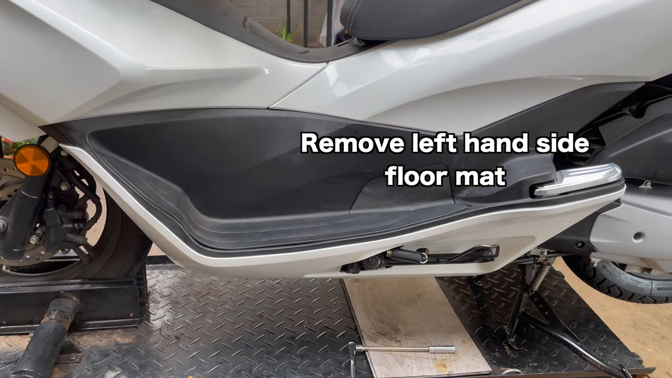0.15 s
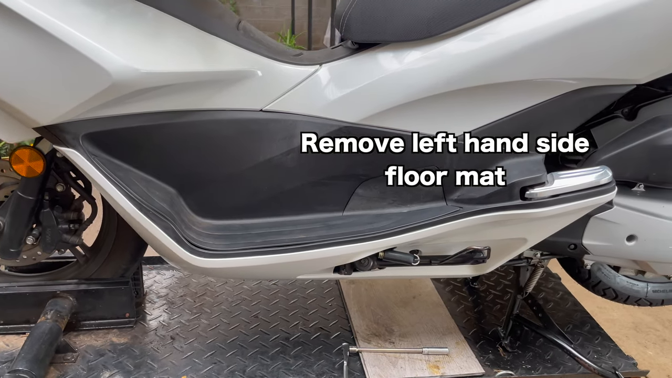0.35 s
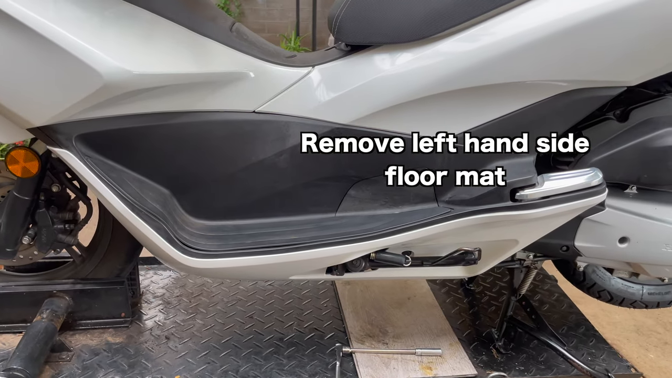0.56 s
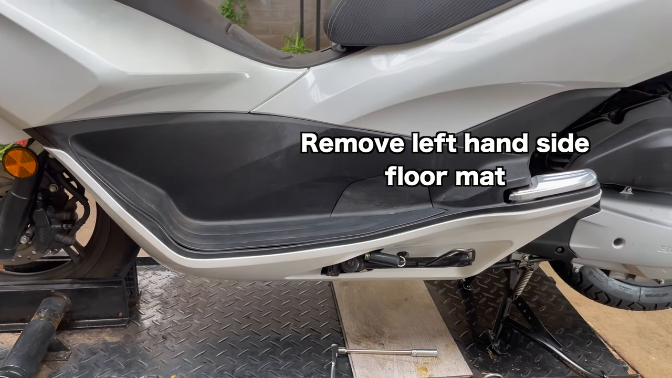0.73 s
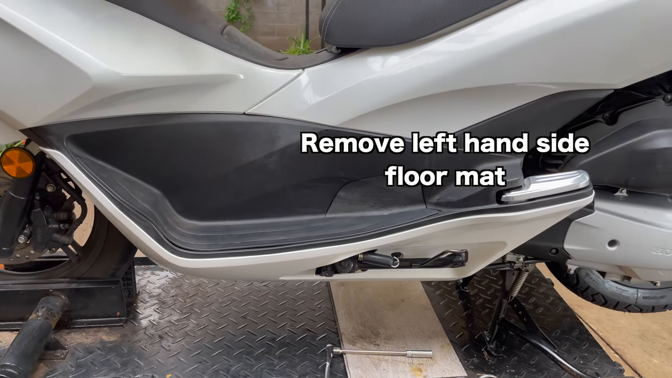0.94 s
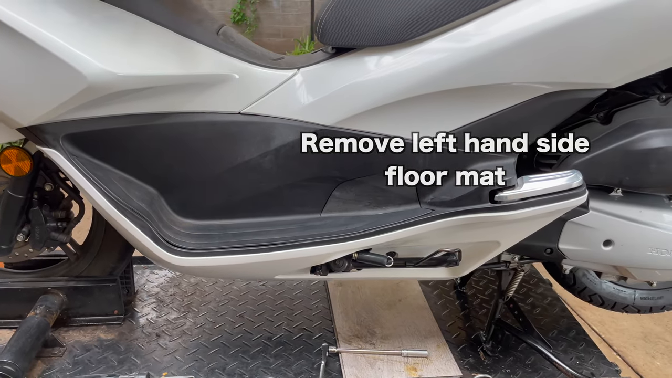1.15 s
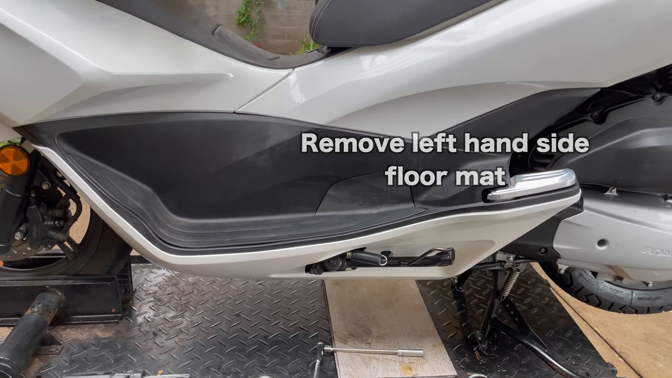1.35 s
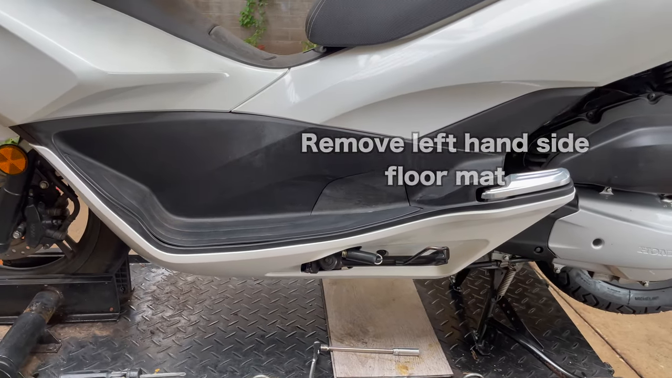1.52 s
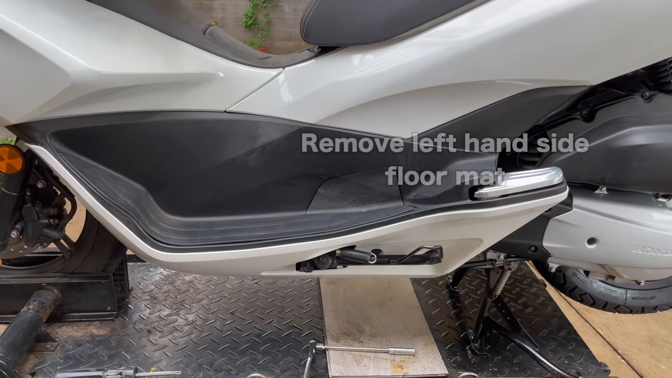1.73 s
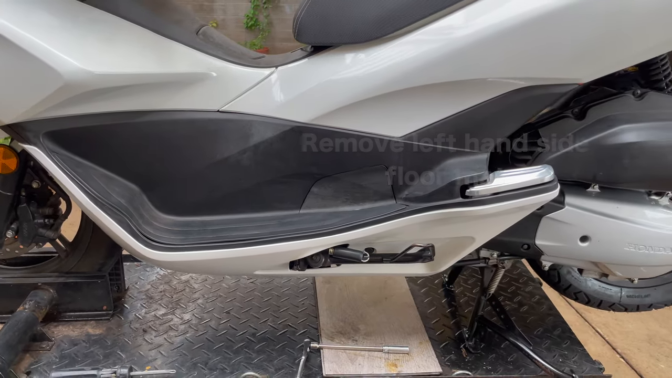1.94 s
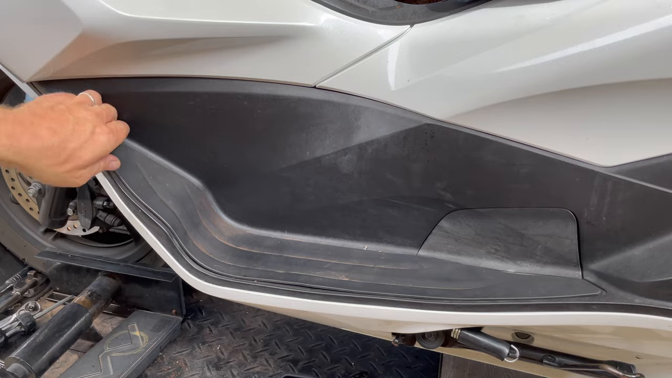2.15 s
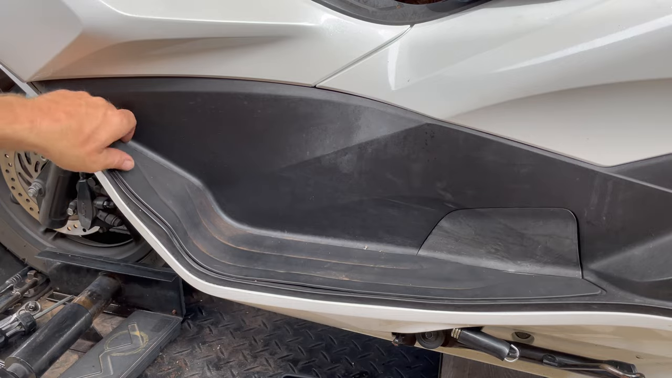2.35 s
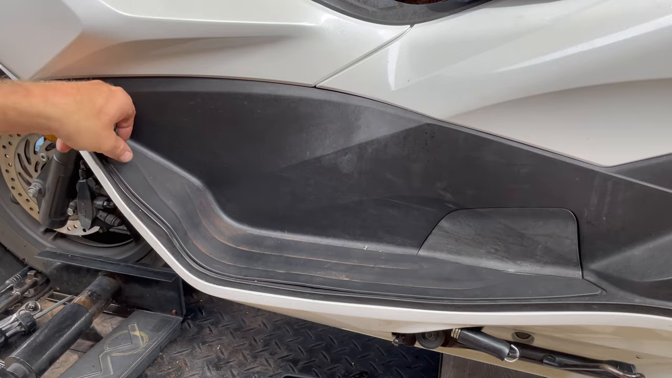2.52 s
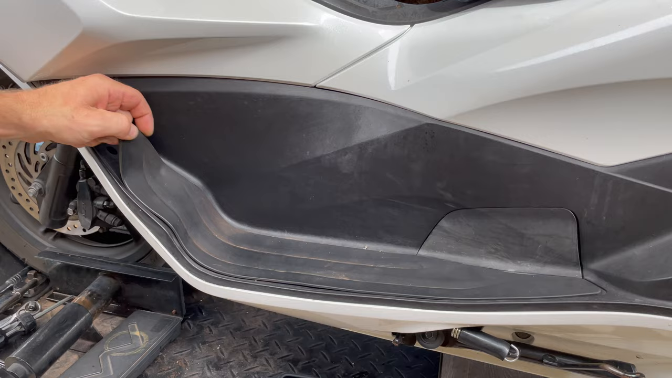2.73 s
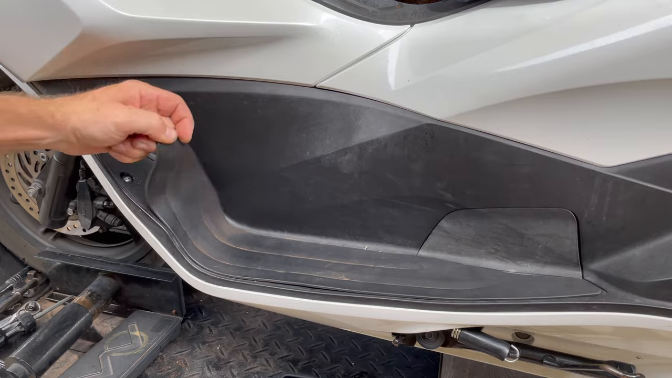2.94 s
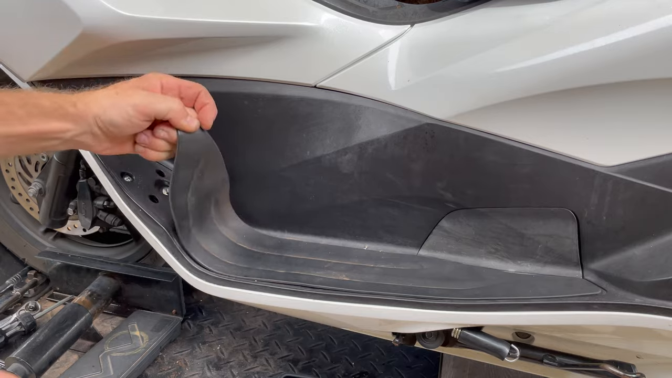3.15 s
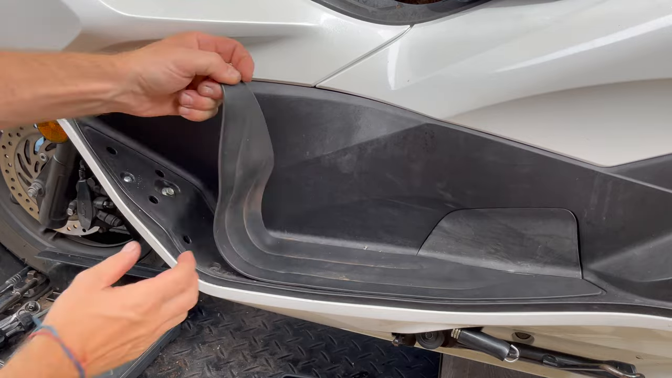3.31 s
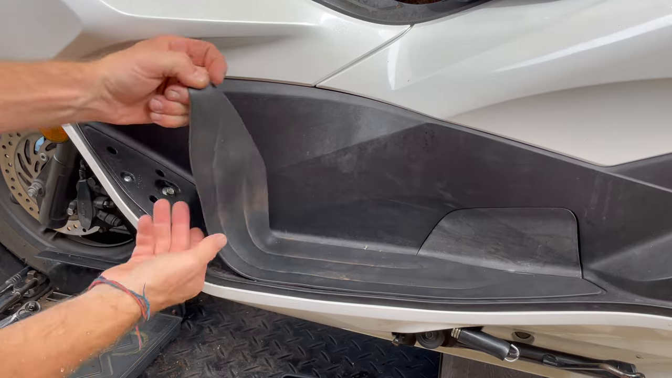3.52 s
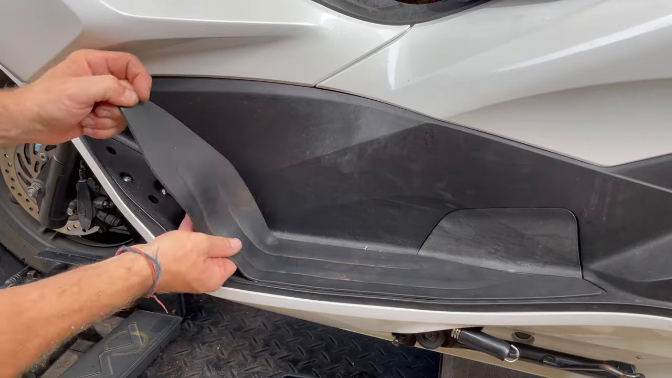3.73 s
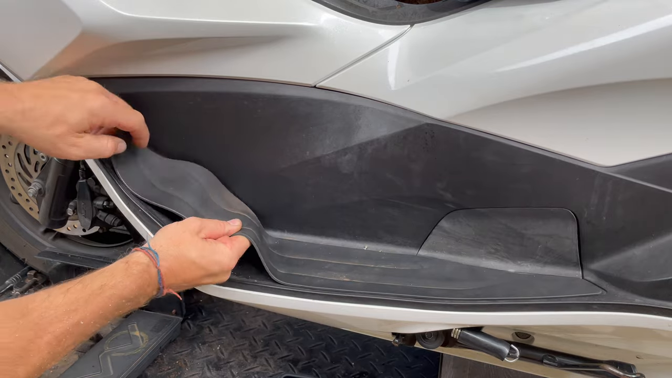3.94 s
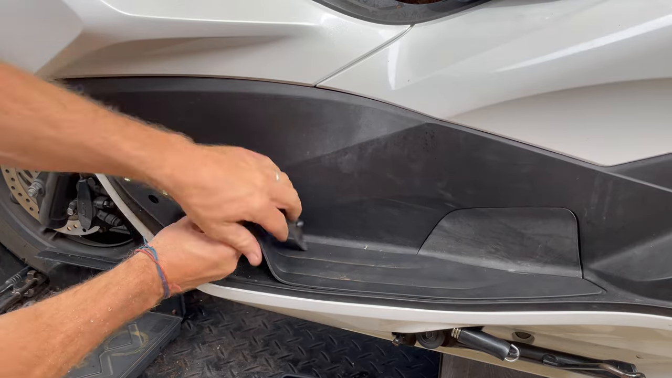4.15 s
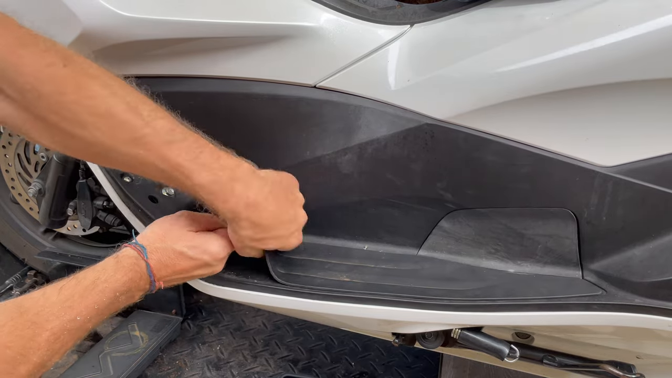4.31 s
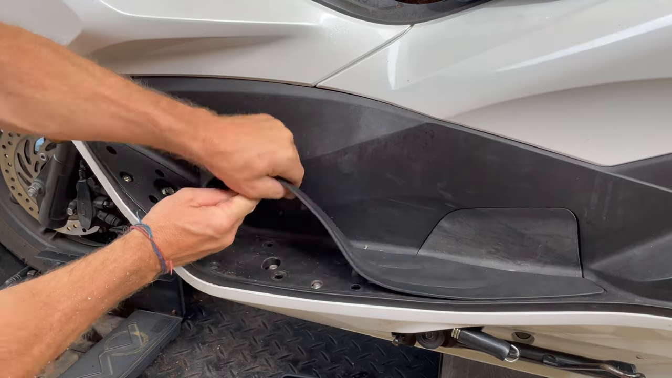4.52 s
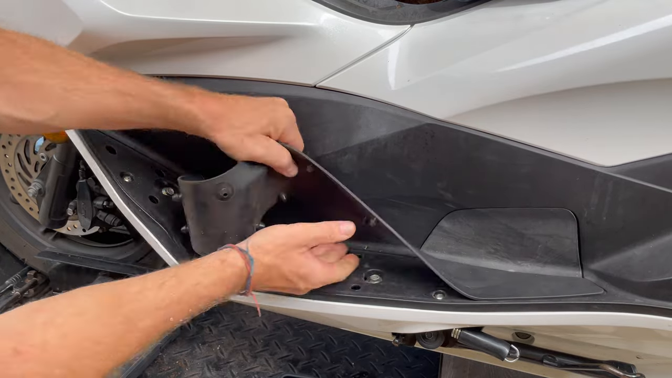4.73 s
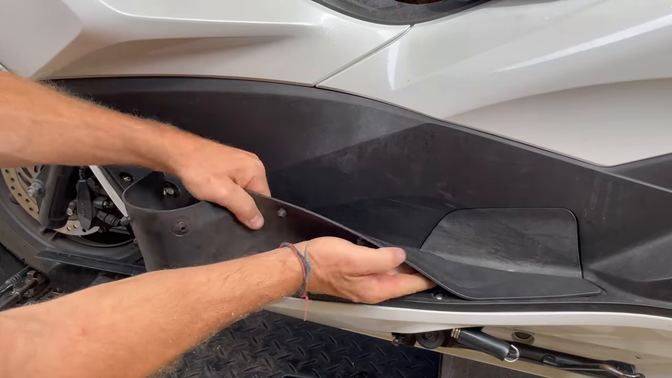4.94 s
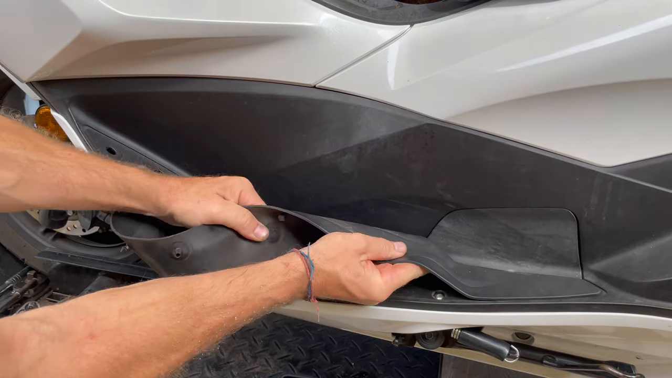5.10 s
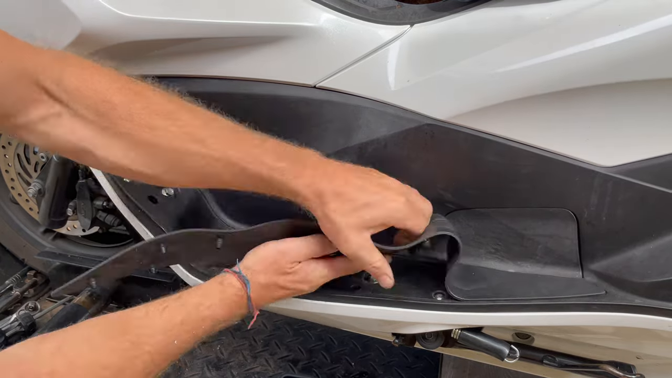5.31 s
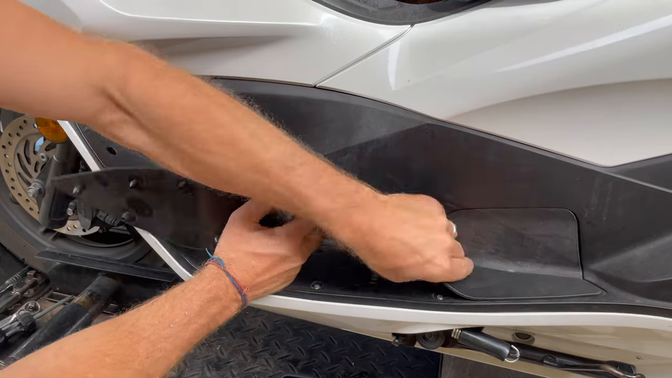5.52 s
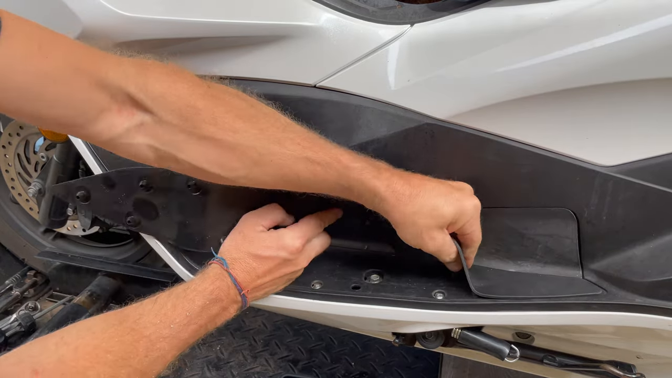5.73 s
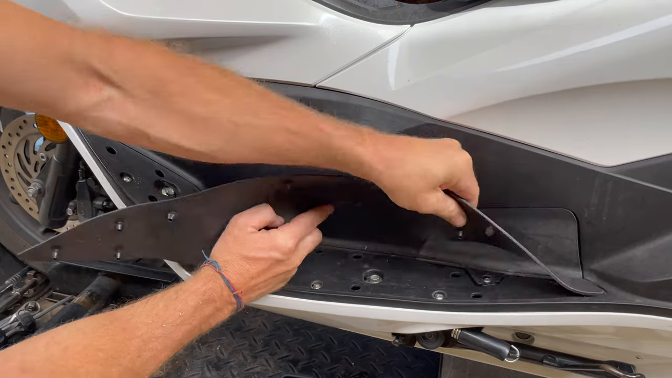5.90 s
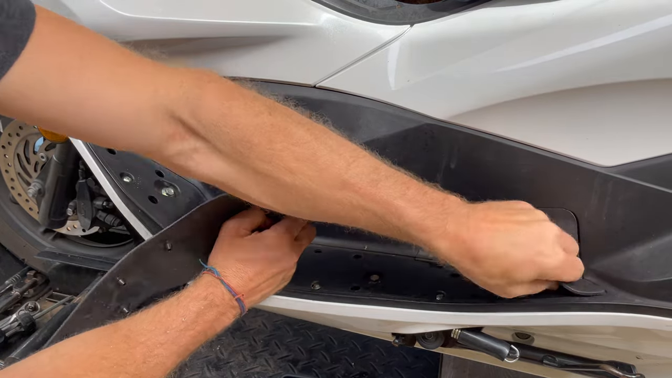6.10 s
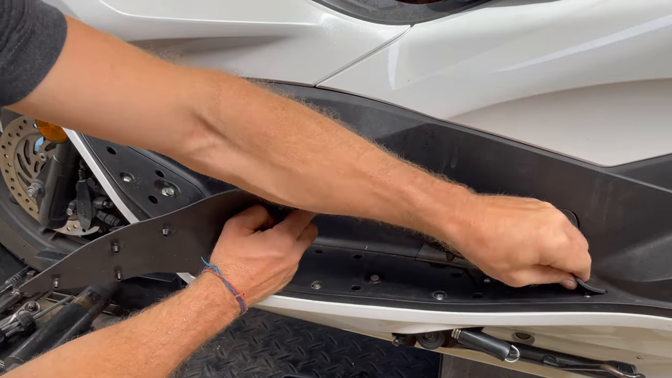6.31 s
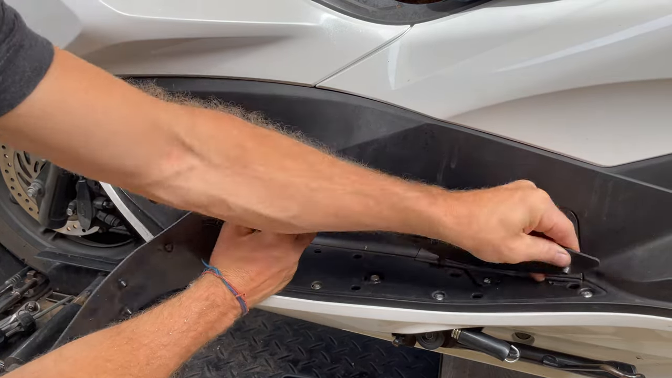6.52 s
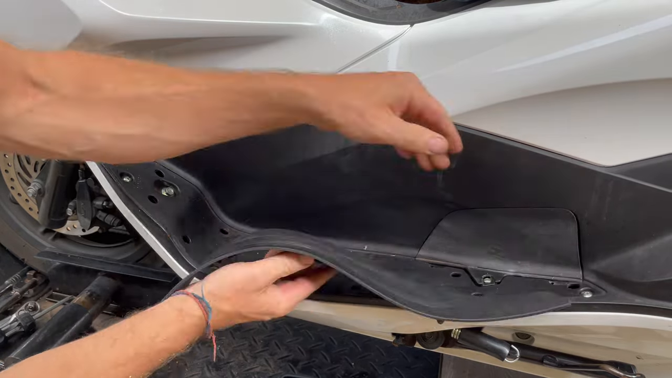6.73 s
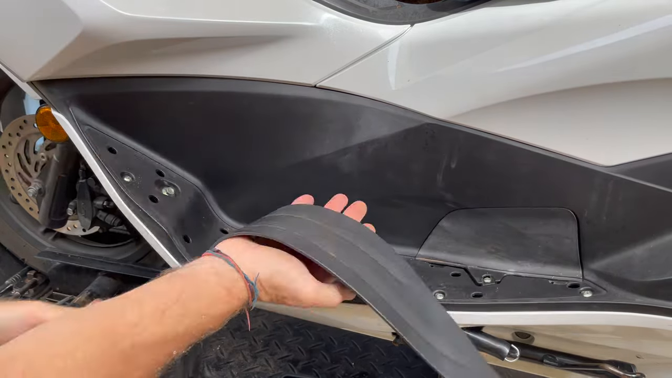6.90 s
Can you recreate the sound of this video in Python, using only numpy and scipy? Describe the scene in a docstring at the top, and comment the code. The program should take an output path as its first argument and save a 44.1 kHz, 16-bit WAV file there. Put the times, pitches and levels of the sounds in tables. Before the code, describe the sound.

Outdoors in a half-open workshop, lively small birds chirp and a distant husky coo fades over a low rumble. After two seconds hands grip a rubber mat on a scooter's plastic footboard. Pegs pop free in irregular bursts, hollow and rattling, between rubbing, bumps and crackles. The mat finally slides off quietly. Close stereo microphone, short echo.

```python
"""Birds and a far, husky coo call first, over a low outdoor rumble; then a rubber mat is peeled off a scooter.
Its pegs pop out of the plastic footboard one by one: each pop rings the hollow panel and rattles the bodywork.
Between the pops the loose mat bumps, rubs, scrapes and crackles; later it slides out over the panel edge.
Blows and rubbing are shaped noise, blows with an echo of the open workshop; birds are gliding, rasping
tones with an echo of the yard; the outdoor air is steady coloured noise."""
import sys
import numpy as np
from scipy import signal
from scipy.fft import rfft, irfft
from scipy.io import wavfile

SR = 44100
rng = np.random.default_rng(int(sys.argv[2]) if len(sys.argv) > 2 else 0)


def materialize(psi):
    """Save the field psi as 16-bit PCM at rate SR to the path in sys.argv[1].

    A 1-D psi becomes a single channel; in a 2-D psi each row is a channel.
    """
    bounded = np.clip(np.atleast_2d(psi).T, -1, 1)
    quanta = np.round(bounded * 32767).astype(np.int16)
    wavfile.write(sys.argv[1], SR, quanta)


N = 311346   # length of the scene [samples]
BLOW_SIZE = 16384   # length of one blow's spectrum [samples]

# pegs leaving their holes: (time [s], panel ring [Hz], ring sharpness [Q], rim ring [Hz], body level [dB],
# thud against body [dB], extra clack [dB], crispness [dB], extra crack [dB], extra tick [dB], rattle [dB])
POPS = [(2.6948, 340, 4.5, 3060, -26.5, 4, 2, 6, -8.5, 6.5, -1.5),
        (2.8545, 513, 2.1, 1490, -32, -1, -2, -1, -1, 12, 2),
        (2.9653, 350, 3, 1780, -33.5, -2.5, 8, 2, -2, 0, -2),
        (2.9993, 342, 3.6, 3200, -33.5, -1, -1.5, 3, -6.5, -7, 1),
        (3.1683, 644, 6, 1600, -23.5, -22, 3, 3, 2.5, 6.5, -9),
        (3.9812, 270, 2.7, 1470, -25.5, 6, -1.5, -4.5, -1.5, -6, 1),
        (4.38, 498, 5.3, 2300, -27, -8.5, -0.5, 1, 0, 3.5, -6.5),
        (4.4817, 674, 3.3, 1210, -21.5, -22, 7, -2, -1, 0, -13),
        (4.5185, 740, 2.8, 1910, -33.5, 3, 0.5, 6, 4, -1.5, -2),
        (4.7130, 420, 2.3, 2080, -36, -5, 2.5, 7.5, 0.5, -0.5, 0),
        (4.7470, 590, 4.3, 1800, -24, -13.5, 1, -2, 0.5, 9.5, -9),
        (5.3808, 363, 3.6, 975, -24, -6, 2.5, -4, 0, 2, -6),
        (5.527, 665, 4.3, 1530, -36.5, -14, -3, 4.5, 4, 1.5, -4.5),
        (5.7193, 537, 6.2, 1730, -25.5, -12, -2, -0.5, -4, 1, 9),
        (5.7392, 540, 6.3, 2020, -21, 2, -1, -1, -1, 8, 9),
        (5.7456, 510, 5, 1780, -19, -2, 2.5, -12, 5, -3, -9),
        (6.3926, 860, 1.5, 2870, -28, 0.5, -1.5, 6.5, -4, 3, -5.5)]
# mat and fingers bumping on the panel: (time [s], panel ring [Hz], body level [dB], crispness [dB])
BUMPS = [(1.301, 940, -52, -1), (2.196, 368, -45.5, -9), (2.209, 435, -42.5, -1), (2.275, 217, -46, -2.5),
         (2.305, 272, -46.5, -27), (2.3278, 534, -38, -2), (2.61, 298, -49.5, 7.5), (2.931, 205, -56.5, 9),
         (3.163, 596, -40, -1.5), (3.241, 405, -42.5, -22), (3.2761, 895, -48, 5.5),
         (3.8258, 450, -37.5, -2.5), (3.8924, 525, -37.5, -1), (3.949, 504, -56.5, 5.5),
         (4.152, 487, -37.5, -4), (4.231, 554, -42, -9), (4.2821, 897, -43, -7), (4.5, 850, -36.5, -4),
         (4.555, 700, -48, -8), (4.575, 600, -50, -8), (4.6384, 490, -44, -2.5), (4.652, 600, -52, -2.5),
         (4.668, 670, -47, -3.5), (4.88, 600, -55.5, 3.5), (4.964, 400, -55.5, 7), (5.012, 800, -58.5, 3),
         (5.238, 900, -55, 11), (5.2921, 300, -41, -1), (5.459, 294, -41.5, -1.5), (5.488, 450, -48, -5),
         (5.771, 242, -47, 7), (5.839, 235, -47, -9), (6.089, 556, -53.5, -24), (6.586, 584, -46.5, 6.5),
         (6.611, 560, -56, 6.5), (6.661, 600, -47, -1), (6.672, 600, -42.5, -0.5), (6.684, 555, -43, -4),
         (6.716, 700, -53, -4), (6.738, 600, -44.5, -2), (6.815, 900, -63.5, 7)]
# a bump that rings lower thuds more; thud and body are equally strong at EVEN_THUD_HZ
EVEN_THUD_HZ, THUD_DB_PER_OCTAVE = 462, 10
BUMP_PANEL_Q, BUMP_RIM_HZ = 4.4, 1530
BUMP_CLACK_DB, BUMP_CRACK_DB, BUMP_TICK_DB, BUMP_RATTLE_DB = -0.4, -1.5, -2.5, 2.5
RIM_Q = 8   # the rim is damped by the mat and rings only a few cycles
# the six registers of a blow (thud, body, clack, snap, crack, tick): (low edge [Hz], high edge [Hz])
REGISTERS = [(90, 350), (350, 1000), (1000, 2500), (2500, 4200), (4200, 7500), (9500, 15000)]
# clack, snap, crack and tick of every blow: (level against body [dB], gain per dB of crispness [dB])
TREBLE = [(-7, 1.04), (-16.7, 1.49), (-21, 1.4), (-29.5, 1.87)]
# how long the bodywork rattles, before each kind of blow stretches it: (pitch [Hz], time to fall 60 dB [s])
PANEL_DECAY = [(120, 0.12), (400, 0.072), (1200, 0.062), (4000, 0.1), (13000, 0.097)]
# the hands work from the left towards the middle: (time [s], lean to the left before PAN_SHARE [dB])
HAND_PAN = [(3.15, 17), (4.0, 9.5), (5.75, 6), (6.4, 1)]
# how much of that lean each pitch gets, mostly the middle range: (pitch [Hz], share [0-1])
PAN_SHARE = [(100, 0.13), (400, 0.12), (1200, 0.25), (5000, 0.52), (10000, 0)]
# how far the left microphone port leads the right: (pitch [Hz], phase [radians])
PORT_PHASE = [(100, -0.5), (700, 0.82), (1600, 0.9), (3400, 0.9), (5000, -1), (7000, 0.5), (8500, 13),
              (10500, -6)]
# how fast the workshop echo dies: (pitch [Hz], time to fall 60 dB [s])
ROOM_DECAY = [(150, .35), (1000, .33), (4000, .33), (13000, .24)]
# tone of the workshop echo, before each kind of blow's echo setting: (pitch [Hz], level [dB])
ROOM_COLOUR = [(100, -19.5), (400, -21.5), (1200, -20), (3500, -22.5), (12000, -16.5), (16000, -47)]

# how hard the hands work the mat, before the rumble setting: (time [s], level [dB])
HANDLING = [(2.0, -69), (2.09, -44.5), (2.28, -43), (2.69, -47.5), (2.88, -37.5), (2.98, -40.5),
            (3.25, -47), (3.97, -41.5), (4.11, -50), (4.42, -44.5), (4.62, -40.5), (5.33, -43), (5.54, -48),
            (6.21, -49.5), (6.68, -61), (7.05, -55.5)]
# tone of the hollow panel's rumble: (pitch [Hz], relative level per Hz [dB])
RUMBLE_COLOUR = [(25, -48), (50, 11.5), (80, 11), (130, 5.5), (220, -1), (300, -5), (500, -22.5),
                 (1000, -72), (4000, -67)]
# tone of rubber rubbing: (pitch [Hz], relative level per Hz [dB])
RUB_COLOUR = [(200, 5), (550, 3.5), (900, 1), (1800, -8.5), (2600, -24), (3500, -13), (7000, -78),
              (12000, -56)]
# tone of rubber hissing: (pitch [Hz], relative level per Hz [dB])
HISS_COLOUR = [(1500, 12.5), (3500, 10.5), (7000, 1), (12000, 0), (14000, -1), (16000, 12.5)]
# pulls that drag the mat, before the rub and hiss settings:
# (time [s], length [s], rubbing level [dB], hiss level [dB])
STROKES = [(2.026, 0.096, -55, -68), (2.27, 0.15, -54.5, -74), (2.695, 0.091, -40.5, -64),
           (3.12, 0.2, -45, -61), (3.313, 0.029, -43, -50.5), (3.595, 0.16, -70.5, -68.5),
           (3.85, 0.12, -56, -73), (3.96, 0.026, -40, -53), (4.118, 0.22, -68.5, -62.5),
           (4.442, 0.14, -43, -87.5), (4.647, 0.14, -65, -55.5), (4.855, 0.085, -54.5, -64),
           (5.151, 0.12, -48, -60), (5.218, 0.04, -46, -51.5), (5.329, 0.032, -57, -54),
           (5.446, 0.12, -43, -59), (5.931, 0.25, -49.5, -66.5), (6.22, 0.32, -56, -67),
           (6.571, 0.22, -48, -64), (6.873, 0.15, -74, -72)]
# a pull takes hold, eases off as the mat gives, and dies away
STROKE_ATTACK_S, STROKE_SAG_DB_PER_S, STROKE_RELEASE_S = 0.028, 32, 0.021
# the mat always drags a little while it is handled: strength against the handling
DRAG_RUB_DB, DRAG_HISS_DB = -18, -33.5
RUB_RUMBLE_DB = -3   # rubbing also shakes the panel: rumble against the rubbing
# the loose mat slides out over the panel edge: (time [s], level [dB])
SLIDE = [(6.42, -62), (6.58, -61), (6.72, -59), (6.82, -60), (6.92, -58.5), (7.06, -62)]
# the stiff edge of the mat rasps along the rim as it lifts: (time [s], length [s], level [dB])
EDGE_RASPS = [(2.695, 0.052, -51), (2.76, .06, -59), (4.6, 0.06, -63)]
# tone of the slide and the edge rasps: (pitch [Hz], relative level per Hz [dB])
SLIDE_COLOUR = [(900, -17), (1500, 2), (1900, 8.5), (2300, 4.5), (2800, 4), (3050, -11), (4800, -9),
                (7000, -33), (12000, -17)]
SLIDE_GRAIN_DB = 2.5   # roughness of the slide
# the underside of the mat scrapes over the footboard: (time [s], length [s], level [dB])
SCRAPES = [(4.585, 0.068, -59), (4.78, 0.043, -56), (5.157, 0.13, -66), (5.939, 0.1, -46.5),
           (6.262, 0.056, -59), (6.633, 0.1, -56)]
# tone of the scrapes: (pitch [Hz], relative level per Hz [dB])
SCRAPE_COLOUR = [(200, -5), (500, 2), (800, 1), (1300, -4.5), (2100, -10.5), (3000, -20), (7000, -28.5)]

# syllables of the nearer birds, before direct and echo settings:
# (time [s], length [s], start pitch [Hz], end pitch [Hz], level [dB], rasp [0-1])
BIRDS = [(-.05, 0.072, 4800, 3950, -54, .56), (-.04, 0.069, 3400, 2640, -55, 0.93),
         (.03, .014, 3300, 2730, -51, 0.36), (.044, .018, 2870, 3460, -47.5, 0),
         (.076, .02, 3140, 3480, -52, 0.33), (.08, 0.043, 3770, 4130, -50.5, 0.83),
         (.09, 0.059, 1874, 1780, -65, 0.6), (.108, .014, 3330, 2780, -48.5, 0.33),
         (.11, 0.038, 6140, 5970, -62.5, 1), (.125, 0.033, 2920, 3310, -55, .7),
         (.168, 0.0091, 3150, 2700, -59, 0.2), (.2, 0.031, 3350, 3670, -55, 0.24),
         (.215, .04, 3820, 4260, -52.5, 0.7), (.234, .01, 3710, 3120, -46, 0.04),
         (.254, 0.021, 3760, 3260, -53.5, 0.5), (.275, .025, 3600, 3560, -58, 0.8),
         (.315, 0.026, 4710, 4840, -52, 0.4), (.337, 0.016, 4790, 4760, -42, 0),
         (.339, .028, 4550, 3350, -45.5, 0.3), (.365, .07, 6900, 6800, -60, 0.8),
         (.395, .05, 5250, 4960, -58.5, 1), (.462, 0.019, 4450, 3990, -46.5, 0.6),
         (.478, 0.024, 3820, 2840, -46, 0.27), (.5, 0.028, 3100, 2640, -57, 0.8),
         (.612, 0.035, 3840, 3380, -47.5, 0.6), (.648, .014, 3470, 2730, -53, 0.65),
         (.665, 0.037, 2790, 2450, -58.5, .8), (.708, 0.05, 3960, 4580, -50, 0.7),
         (.748, 0.02, 4650, 4600, -44.5, 0.3), (.762, .04, 4460, 3350, -45.5, 0.27),
         (.802, .012, 2650, 2990, -47, 0.4), (.812, .018, 3440, 2720, -51.5, 0.95),
         (.815, .03, 6450, 5870, -57.5, 0.74), (.82, 0.0234, 2460, 2010, -59, 0.37),
         (.94, 0.083, 4300, 4150, -60, 0.2), (1.115, 0.035, 7740, 6900, -56, .5),
         (1.137, 0.041, 6240, 5020, -61, .3), (1.175, 0.041, 5010, 5050, -62, .4),
         (1.228, 0.033, 4780, 4940, -60, 0.26), (1.255, 0.059, 5150, 5400, -57, 0.5),
         (1.405, 0.036, 5870, 5770, -59.5, 0.3), (1.42, 0.11, 5410, 3660, -66, 0.97),
         (1.655, 0.033, 5500, 6500, -62, .3), (1.68, 0.062, 6280, 4910, -57.5, 0.6),
         (1.745, 0.051, 5220, 4160, -58, .7), (1.81, 0.041, 4190, 3650, -59, 0.44),
         (1.83, 0.057, 1905, 1770, -64, 0.33), (1.845, .06, 3660, 3270, -57, 0.38),
         (1.86, .06, 3994, 3960, -60, 0.21), (1.985, 0.044, 6230, 6430, -63.5, 1)]
# thin calls of birds well beyond the yard, likewise:
# (time [s], length [s], start pitch [Hz], end pitch [Hz], level [dB], rasp [0-1])
FAR_BIRDS = [(2.42, 0.2, 3620, 3520, -74.5, 0.55), (2.76, 0.144, 3510, 3320, -73, 0.9),
             (3.07, 0.09, 1620, 1755, -61, 0.9), (3.33, 0.15, 1690, 1600, -62.5, 0.18),
             (3.42, 0.13, 3130, 3380, -71, 0.23), (3.53, 0.086, 3500, 3710, -71.5, 0.5),
             (3.76, 0.13, 3660, 3400, -72, 0.95), (3.88, .08, 3260, 2990, -75, 0.96),
             (4.08, 0.052, 3940, 3580, -70, 0.8), (4.29, 0.041, 3610, 3280, -65, 0.64),
             (4.32, 0.049, 2790, 2730, -63, 0), (4.41, 0.045, 3900, 3700, -73, 0.47),
             (4.81, 0.11, 5400, 5220, -72, .5), (5.02, 0.041, 4770, 4000, -67.5, 0.9),
             (5.04, 0.095, 3680, 3340, -65, 0.57), (5.63, 0.062, 4120, 3500, -69, 0.8),
             (5.85, 0.047, 4500, 3400, -65.5, 0.9), (6.215, 0.032, 4900, 4230, -63.5, 0.91),
             (6.25, 0.054, 3930, 3290, -70, 0.85), (6.78, .06, 4440, 4660, -71, 0.15)]
# a far, husky coo, likewise: (time [s], length [s], start pitch [Hz], end pitch [Hz], level [dB], rasp [0-1])
COOS = [(-.05, 0.081, 748, 756, -49.5, 0.73), (.19, 0.255, 730, 768.5, -51.5, 0.78),
        (.36, .28, 714, 621, -56.5, 0.91)]
# rasping whistles carry a weak, shaking octave; distance dulls the top
OCTAVE_DB, OCTAVE_WAVER, BIRD_TOP_HZ = -14, .06, 6590
# tone of the outdoor background: (pitch [Hz], relative level per Hz [dB])
AIR_COLOUR = [(13, -19), (25, -19), (45, 2.5), (78, 1), (165, -12), (457, -20), (672, -15.5), (1490, -28.5),
              (3150, -34), (5170, -36), (6810, -40.5), (8030, -67), (9220, -60.5), (10600, -46.5),
              (12100, -42.5), (14400, -52.5), (15400, -64)]
AIR_DB = -51

# likeness of left and right in wide sounds (air, echoes, rubbing, sliding): (pitch [Hz], correlation [-1 to 1])
WIDE_LIKENESS = [(60, 0.96), (130, 0.79), (300, 0.61), (700, -0.35), (3000, 0.23), (13000, -0.01)]
# likeness of left and right in the other close sounds: (pitch [Hz], correlation [-1 to 1])
NEAR_LIKENESS = [(100, 1), (300, 0.74), (800, 0.99), (2500, 0.42), (7000, 0.033), (12000, 0.15)]
# the microphone's top end: (pitch [Hz], level [dB])
MIC_TOP = [(6500, 0), (11500, 3), (13800, 1), (16000, -19)]
CUTOFF_HZ = 16400


def peg_pops():
    """Pegs jump out of their holes: rubber tears free and the panel rings and rattles."""
    return blows(POPS, lag_s=0.00436, lag_power=0.707, panel_db=3.0, rim_db=4.5, tear_db=6.0, tear_t60=0.012,
                 rattle_rise_s=0.00072, rattle_stretch=0.97, low_hz=90.0, room_db=0.5)


def mat_bumps():
    """Mat and fingers land on the panel: softer blows whose thud follows the pitch of the ring."""
    s, panel_hz, level_db, crisp_db = np.transpose(BUMPS)
    thud_db = THUD_DB_PER_OCTAVE * np.log2(EVEN_THUD_HZ / panel_hz)
    columns = np.broadcast_arrays(s, panel_hz, BUMP_PANEL_Q, BUMP_RIM_HZ, level_db, thud_db, BUMP_CLACK_DB,
                                  crisp_db, BUMP_CRACK_DB, BUMP_TICK_DB, BUMP_RATTLE_DB)
    return blows(np.column_stack(columns), lag_s=0.003614, lag_power=0.599, panel_db=6.0, rim_db=-17.0,
                 tear_db=5.0, tear_t60=0.0095, rattle_rise_s=0.00087, rattle_stretch=0.63,
                 low_hz=104, room_db=10.5)


def blows(rows, lag_s, lag_power, panel_db, rim_db, tear_db, tear_t60, rattle_rise_s, rattle_stretch,
          low_hz, room_db):
    """A bending wave runs through the panel, rings it briefly and sets the bodywork rattling."""
    out, hz = np.zeros((2, N)), bins(BLOW_SIZE) + 1
    # high bending waves travel faster: the tick comes first, the thud last (lag_s at 250 Hz)
    delay = lag_s * (250 / hz) ** lag_power
    panel = np.exp(-2j * np.pi * np.cumsum(delay) * SR / BLOW_SIZE) * high_pass(low_hz, order=3)
    # the hollow footboard has one low ring of its own
    panel = panel * resonance(207, q=8.9, gain_db=1.5)
    ports = np.exp(1j * at_hz(PORT_PHASE, hz) * np.array([[.5], [-.5]]))
    grit = from_db(tear_db) * high_pass(2540, order=2)
    rattle_decay = np.multiply(PANEL_DECAY, [1, rattle_stretch])
    for (s, panel_hz, panel_q, rim_hz, level_db, thud_db, clack_db, crisp_db,
         crack_db, tick_db, rattle_db) in rows:
        levels_db = register_levels(level_db, thud_db, clack_db, crisp_db, crack_db, tick_db)
        rings = resonance(panel_hz, panel_q, panel_db) * resonance(rim_hz, RIM_Q, rim_db)
        tear = grit * rfft(dying_noise([(1, tear_t60)], NEAR_LIKENESS, rise_s=0.00098))
        rattle = from_db(rattle_db) * rfft(dying_noise(rattle_decay, NEAR_LIKENESS, rattle_rise_s))
        lean_db = np.interp(s, *np.transpose(HAND_PAN)) * at_hz(PAN_SHARE, hz)
        sides = from_db(lean_db * [[.5], [-.5]])
        spectrum = panel * ports * rings * (1 + tear + rattle) * sides
        near = irfft(voiced(spectrum, levels_db))[:, :BLOW_SIZE // 2]
        echo = workshop(rise_s=0.0049, room_db=room_db)
        add(out, s, near)
        add(out, s, signal.fftconvolve(near, echo, axes=1))
    return out


def register_levels(level_db, thud_db, clack_db, crisp_db, crack_db, tick_db):
    """Levels of a blow from thud to tick: the faster the rubber lets go, the more treble."""
    base_db, share = np.transpose(TREBLE)
    clack, snap, crack, tick = base_db + share * crisp_db
    return level_db + np.array([thud_db, 0, clack + clack_db, snap, crack + crack_db, tick + tick_db])


def voiced(spectrum, levels_db):
    """Tilt a blow smoothly towards its register levels, counting its energy as spread over 20 ms."""
    hz, centres = bins(BLOW_SIZE), np.sqrt(np.prod(REGISTERS, axis=1))
    for _ in range(2):   # a second pass comes closer
        power = 2 * abs(spectrum.mean(axis=0)) ** 2 / (BLOW_SIZE * .02 * SR)
        now_db = [10 * np.log10(power[(hz > low) & (hz < high)].sum()) for low, high in REGISTERS]
        change_db = np.subtract(levels_db, now_db)
        spectrum = spectrum * causal(at_hz(np.c_[centres, change_db], hz))
    return spectrum


def resonance(centre_hz, q, gain_db):
    """Plain passage plus one peak, as when a part rings at its own pitch."""
    b, a = signal.iirpeak(centre_hz, q, fs=SR)
    return 1 + from_db(gain_db) * signal.freqz(b, a, bins(BLOW_SIZE), fs=SR)[1]


def workshop(rise_s, room_db):
    """Echo of the half-open workshop: noise that dies at a rate set for each pitch."""
    return dying_noise(ROOM_DECAY, WIDE_LIKENESS, rise_s, colour=ROOM_COLOUR) * from_db(room_db)


def handling(rumble_db, rub_db, hiss_db, grip_db):
    """Rubber drags over plastic in tiny slips, and the hollow panel rumbles under the hands."""
    t = np.arange(N) / SR
    hands = from_db(np.interp(t, *np.transpose(HANDLING), left=-120))
    rub, hiss = friction(t, hands)
    rumble = np.hypot(hands, from_db(RUB_RUMBLE_DB) * rub)
    # fast and slow roughness of the grip
    slips = rms_one(from_db(grip_db * (0.55 * drift(700, N) + 0.55 * drift(50, N))))
    return (from_db(rumble_db) * rumble * stereo_noise(RUMBLE_COLOUR, NEAR_LIKENESS, N)
            + from_db(rub_db) * rub * slips * stereo_noise(RUB_COLOUR, WIDE_LIKENESS, N)
            + from_db(hiss_db) * hiss * slips * stereo_noise(HISS_COLOUR, NEAR_LIKENESS, N)
            + from_db(-12.5) * rub * crackle(per_s=90, spread_db=10.5, t60=0.019))


def friction(t, hands):
    """Strength of rubbing and of hiss: a light drag that follows the hands, and the pulls on top."""
    rub, hiss = from_db(DRAG_RUB_DB) * hands, from_db(DRAG_HISS_DB) * hands
    for s, length, rub_db, hiss_db in STROKES:
        pull = stroke(t - s, length)
        rub = np.hypot(rub, from_db(rub_db) * pull)
        hiss = np.hypot(hiss, from_db(hiss_db) * pull)
    return rub, hiss


def stroke(age, length):
    """Strength of one pull: it takes hold, sags while held, then lets go."""
    held = np.clip(age, 0, length)
    release = np.exp(-np.maximum(age - length, 0) / STROKE_RELEASE_S)
    return np.minimum(held / STROKE_ATTACK_S, 1) * from_db(-STROKE_SAG_DB_PER_S * held) * release


def pulls(rows):
    """Strength over time of a list of single pulls."""
    t = np.arange(N) / SR
    return sum(from_db(db) * stroke(t - s, length) for s, length, db in rows)


def crackle(per_s, spread_db, t60):
    """The rubber catches at random moments and lets go with a tiny tick; rms 1."""
    caught = rng.random(N) < per_s / SR
    strength = from_db(spread_db * rng.uniform(-1.3, 1, N)) * rng.choice([-1, 1], N)
    tick = dying_noise([(1, t60)], NEAR_LIKENESS, rise_s=0.00036, colour=RUB_COLOUR)
    return rms_one(signal.fftconvolve((caught * strength)[None], tick, axes=1)[:, :N])


def sliding():
    """The mat slides over the panel edge, and its stiff edge rasps along the rim: grainy noise."""
    slide = from_db(np.interp(np.arange(N) / SR, *np.transpose(SLIDE), left=-120))
    grain = rms_one(from_db(SLIDE_GRAIN_DB * drift(300, N)))
    return (slide + pulls(EDGE_RASPS)) * grain * stereo_noise(SLIDE_COLOUR, WIDE_LIKENESS, N)


def scraping(grain_db, grains_per_s):
    """The mat's underside judders over the plastic: a soft, grainy scrape."""
    judder = rms_one(from_db(grain_db * drift(grains_per_s, N)))
    return pulls(SCRAPES) * judder * stereo_noise(SCRAPE_COLOUR, NEAR_LIKENESS, N)


def settling(below_db, fade_s, grains_per_s):
    """After each pop the freed rubber shifts in a dying run of tiny catches."""
    t = np.arange(N) / SR
    stir = sum(from_db(row[4]) * np.exp(-abs(t - row[0]) / fade_s) * (t > row[0]) for row in POPS)
    return from_db(below_db) * stir * crackle(per_s=grains_per_s, spread_db=4.5, t60=0.014)


def near_birds():
    """Quick, wavering whistles of the nearer birds, leaning left."""
    return birds(BIRDS, waver=.065, waver_rate=450, bow=1.8, husk_db=-2, husk_rate=300, second_ratio=.88,
                 second_db=-8, direct_db=-5.5, echo_db=1.0, t60=0.62, pan_db=4.5)


def far_birds():
    """Thin calls from beyond the yard, with little direct sound."""
    return birds(FAR_BIRDS, waver=0.07, waver_rate=364, bow=1.3, husk_db=-3, husk_rate=300, second_ratio=0.93,
                 second_db=-3, direct_db=-10, echo_db=-.5, t60=.45, pan_db=2)


def far_coo():
    """A low, husky coo: a slow glide with strong roughness and a long echo."""
    return birds(COOS, waver=0.081, waver_rate=180, bow=1.21, husk_db=-0.5, husk_rate=170, second_ratio=.92,
                 second_db=-1, direct_db=-12.0, echo_db=-7.0, t60=0.82, pan_db=0.5)


def birds(rows, waver, waver_rate, bow, husk_db, husk_rate, second_ratio, second_db, direct_db, echo_db,
          t60, pan_db):
    """Gliding, slightly hoarse tones, heard mostly by way of the yard walls."""
    out = np.zeros((1, N))
    for s, length, start_hz, end_hz, level_db, rasp in rows:
        u = np.linspace(0, 1, int(length * SR))
        glide = end_hz + (start_hz - end_hz) * (1 - u) ** bow
        # with rasp the pitch shakes and the two sides of the bird's voice organ sing slightly apart
        voices = ((1, 1, waver),
                  (second_ratio, rasp * from_db(second_db), 2 * waver),
                  (2, rasp * from_db(OCTAVE_DB), OCTAVE_WAVER))
        for ratio, share, shake in voices:
            hz = ratio * glide * (1 + rasp * shake * drift(waver_rate, len(u)))
            husk = 1 + rasp * from_db(husk_db) * drift(husk_rate, len(u))
            swell = np.sqrt(abs(np.sin(np.pi * u))) * husk
            tone = rms_one(swell * np.sin(2 * np.pi * np.cumsum(hz) / SR))
            add(out, s, share * from_db(level_db) * tone[None])
    out = signal.sosfilt(signal.butter(8, BIRD_TOP_HZ, fs=SR, output="sos"), out)
    yard = dying_noise([(1, t60)], WIDE_LIKENESS, rise_s=0.00051, size=2 * BLOW_SIZE)
    echo = signal.fftconvolve(out, yard, axes=1)[:, :N]
    heard = from_db(direct_db) * out + from_db(echo_db) * echo
    return heard * from_db(np.array([[.5], [-.5]]) * pan_db)   # a positive pan leans left


def outdoor_air():
    """Steady outdoor background: noise with most of its strength in the lows."""
    return from_db(AIR_DB) * stereo_noise(AIR_COLOUR, WIDE_LIKENESS, N)


def microphone(x, notch_hz, width_hz, notch_db):
    """The ports swallow a narrow band of the treble, and the very top droops."""
    dip = notch_db * np.exp(-((bins(BLOW_SIZE) - notch_hz) / width_hz) ** 2)
    top = at_hz(MIC_TOP, bins(BLOW_SIZE))
    return signal.fftconvolve(x, irfft(causal(dip + top))[None], axes=1)[:, :N]


def from_db(db):
    """Turn decibels into a gain."""
    return 10 ** (np.asarray(db) / 20)


def rms_one(x):
    """Scale to an average strength (rms) of 1."""
    return x / np.sqrt(np.mean(x ** 2) + 1e-20)


def at_hz(points, hz):
    """Read a table between its points, with pitch counted in octaves."""
    f, value = np.transpose(points)
    return np.interp(np.log(np.maximum(hz, 1)), np.log(f), value)


def bins(size):
    """Frequencies of a spectrum [Hz]."""
    return np.arange(size // 2 + 1) * SR / size


def add(out, s, sound):
    """Mix a sound in at a time; whatever falls outside the scene is left off."""
    i = round(s * SR)
    part = sound[:, max(-i, 0):N - i]
    out[:, max(i, 0):max(i, 0) + part.shape[1]] += part


def drift(rate, size):
    """Random wandering around zero, with rate fresh values per second joined by straight lines."""
    knots = rng.standard_normal(int(size / SR * rate) + 2)
    return np.interp(np.arange(size) / SR * rate, np.arange(len(knots)), knots)


def stereo_noise(spectrum, likeness, size):
    """Coloured noise, partly shared by the two sides; rms 1."""
    hz = bins(size)
    alike = np.clip(at_hz(likeness, hz), -.99, .99)
    mid, side = rfft(rng.standard_normal((2, size)))
    both = np.sqrt(1 + alike) * mid + np.sqrt(1 - alike) * side * [[1], [-1]]
    return rms_one(irfft(both * from_db(at_hz(spectrum, hz)), size))


def dying_noise(decay, likeness, rise_s, size=BLOW_SIZE, colour=((1, 0),)):
    """Countless tiny rings, each octave dying at its own rate; unit energy unless coloured."""
    t = np.arange(size) / SR
    octave = np.log2(np.clip(bins(size), 2 ** 7, 2 ** 14))
    noise = rfft(stereo_noise([(1, 0), (2, 0)], likeness, size))   # equally strong at every pitch
    noise = noise * from_db(at_hz(colour, bins(size)))
    onset = (1 - np.exp(-t / rise_s)) * (1 - t / t[-1])
    out = 0
    for k in range(7, 15):   # octaves centred on 128 Hz to 16384 Hz
        fade = onset * np.exp(-np.log(1000) * t / at_hz(decay, 2 ** k))
        band = irfft(noise * np.maximum(1 - abs(octave - k), 0), size)
        out = out + band * rms_one(fade)
    return out / np.sqrt(size)


def causal(level_db):
    """The minimum-phase filter with this curve: nothing sounds early."""
    cepstrum = irfft(np.log(from_db(level_db)))
    half = len(cepstrum) // 2
    fold = np.r_[1, np.full(half - 1, 2), 1, np.zeros(half - 1)]
    return np.exp(rfft(cepstrum * fold))


def high_pass(edge_hz, order):
    """Response of a filter that holds back the lows."""
    b, a = signal.butter(order, edge_hz, "high", fs=SR)
    return signal.freqz(b, a, bins(BLOW_SIZE), fs=SR)[1]


def scene():
    """Mat and panel close by, birds and air beyond."""
    mat = peg_pops() + mat_bumps()
    mat = mat + handling(rumble_db=1.0, rub_db=-1.0, hiss_db=8.5, grip_db=5.0) + sliding()
    mat = mat + scraping(grain_db=4.5, grains_per_s=190)
    mat = mat + settling(below_db=-20, fade_s=0.037, grains_per_s=160)
    calls = near_birds() + far_birds() + far_coo()
    # the air's tone table is already complete, so it skips the microphone filter
    return microphone(mat + calls, notch_hz=8530, width_hz=710, notch_db=-14.0) + outdoor_air()


def record(dry):
    """A steep filter cuts off the very top."""
    return signal.sosfilt(signal.cheby2(14, 70, CUTOFF_HZ, fs=SR, output="sos"), dry)


dry = scene()
out = record(dry)
materialize(out)
```